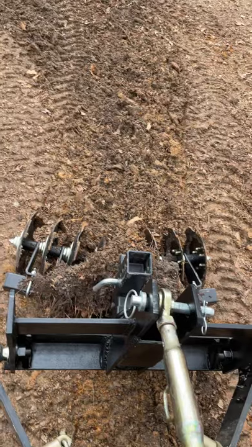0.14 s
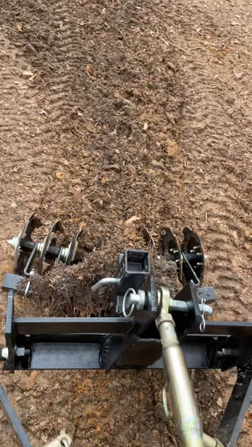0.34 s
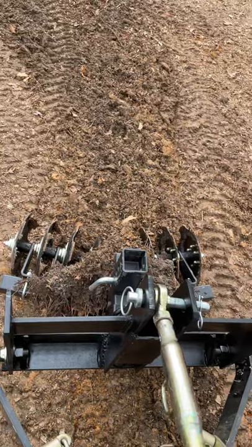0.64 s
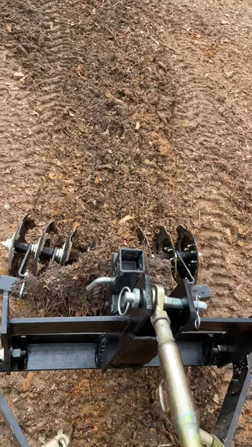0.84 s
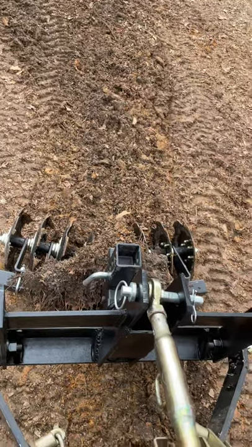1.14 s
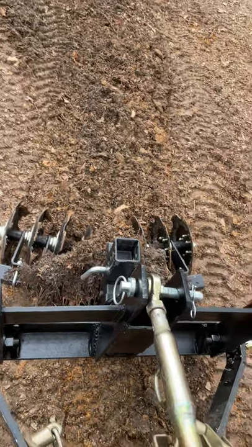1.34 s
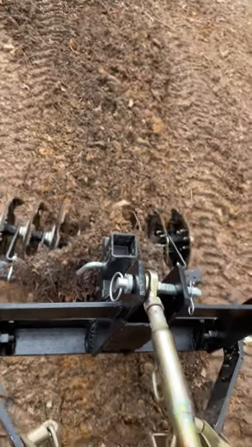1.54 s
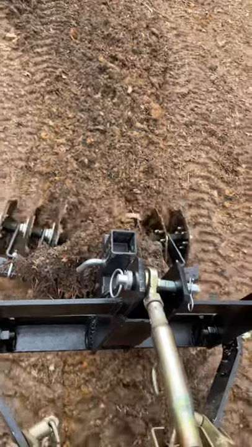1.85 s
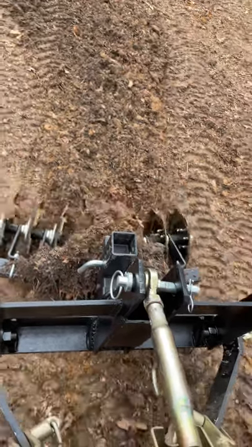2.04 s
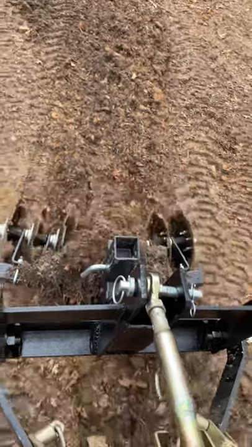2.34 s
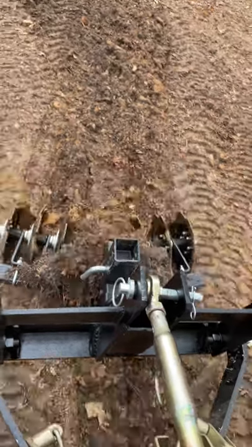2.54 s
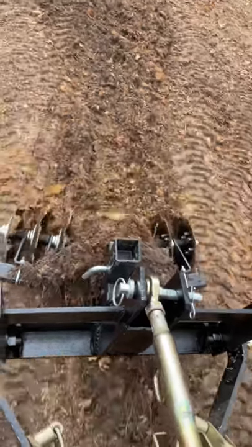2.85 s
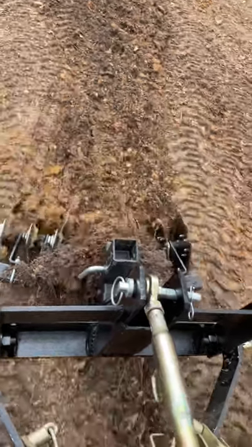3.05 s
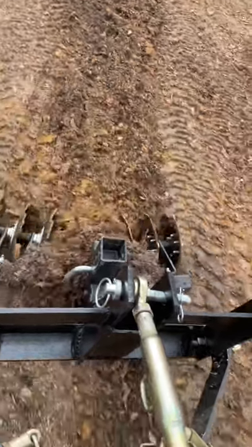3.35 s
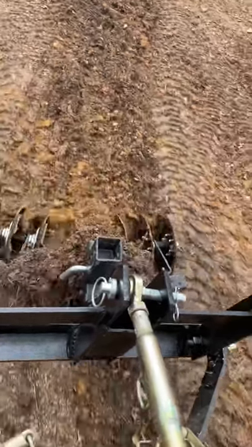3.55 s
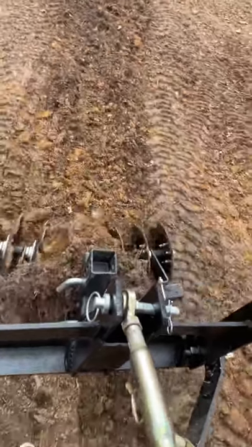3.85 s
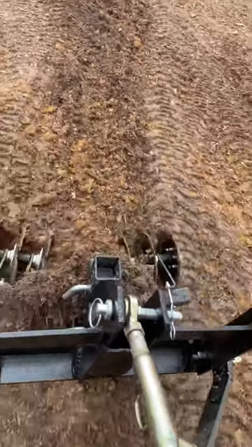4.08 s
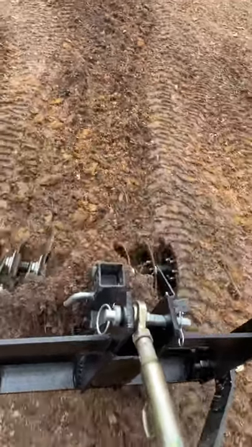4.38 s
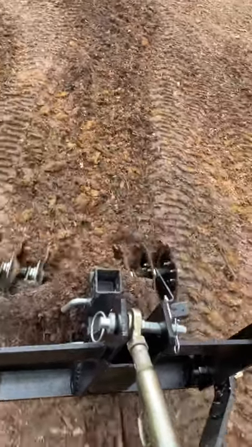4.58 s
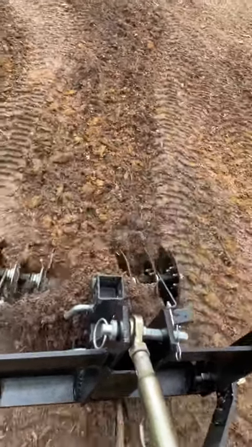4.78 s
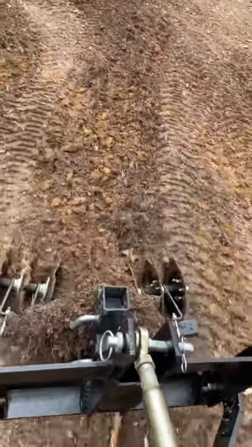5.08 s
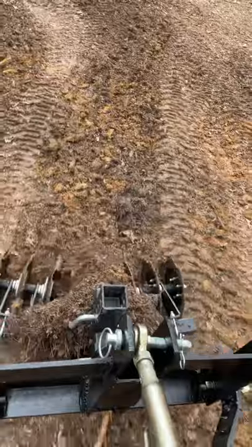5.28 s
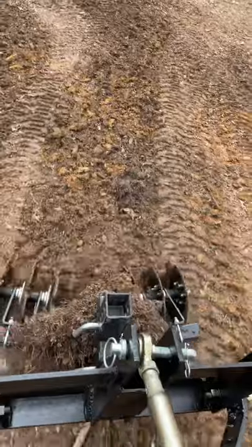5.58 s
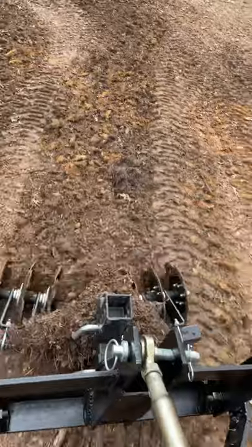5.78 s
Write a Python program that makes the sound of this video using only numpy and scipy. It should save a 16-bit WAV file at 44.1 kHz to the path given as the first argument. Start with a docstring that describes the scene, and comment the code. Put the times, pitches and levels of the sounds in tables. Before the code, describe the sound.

A three-cylinder diesel runs at steady working speed, buzzing and humming close to the microphone, with belt-driven howl and thin gear whines. At first the soil noise is an even, faint crunch; shortly after one second the drive takes load, knocks sharpen, a pump whines and soil rushes irregularly over the discs. Pebbles grate and snap, and one disc squeals very briefly after four seconds. Open field, close stereo pickup.

```python
"""On a field, at the seat of a three-cylinder diesel compact tractor that pulls a disc harrow.
Exhaust, engine orders, gears and belt drive are tones locked to the engine cycle; block, covers, panels,
casing and injector lines are noise, partly repeated each cycle, filtered by resonances or spectra. Just after
a second the drive takes load: the engine sags, the hydraulic pump whines and the soil gushes more unevenly.
Random grains crumble as soil and grate as stones on the discs; edges snap and one disc sings briefly."""
import sys
import numpy as np
from scipy import signal
from scipy.fft import rfft, irfft
from scipy.io import wavfile
from scipy.ndimage import uniform_filter1d

SR = 44100
rng = np.random.default_rng(int(sys.argv[2]) if len(sys.argv) > 2 else 0)


def unload_audio(sound):
    """Save the sound as a 16-bit wav file, at the path given as the first command line argument."""
    columns = np.transpose(np.atleast_2d(sound))
    # keep every value between -1 and 1, then stretch to whole-number steps
    steps = np.round(np.clip(columns, -1, 1) * 32767)
    wavfile.write(sys.argv[1], SR, steps.astype(np.int16))


N = 261072
TIME = np.arange(N) / SR
FREQ = np.maximum(np.fft.rfftfreq(N, 1 / SR), 1)
CYLINDERS = 3


def undb(db):
    """Logarithmic level: decibels become an amplitude gain."""
    return 10 ** (np.asarray(db) / 20)


def unit(x):
    """Normalisation: scale to rms 1."""
    return x / np.sqrt(np.mean(x ** 2))


def curves(table):
    """Linear interpolation: the columns of a curve table at every sample."""
    s, *columns = np.transpose(table)
    return [np.interp(TIME, s, column) for column in columns]


def walk(rate):
    """Low-passed random process: levels held for 1 / rate s and slewed twice; rms 1."""
    hold = int(SR / rate)
    held = np.repeat(rng.standard_normal(N // hold + 1), hold)
    slewed = uniform_filter1d(uniform_filter1d(held, hold), hold)
    return unit(slewed[:N])


def slope(points):
    """Spectral envelope: gain at every frequency from (f/Hz, level/dB) points."""
    hz, db = np.transpose(points)
    return undb(np.interp(np.log(FREQ), np.log(hz), db))


def resonances(modes):
    """Modal superposition: damped modes with squared, steep skirts, at half amplitude one width from f."""
    total = 0
    for hz, width, db in modes:
        detuning = hz / width * (FREQ / hz - hz / FREQ)
        total = total + undb(db) / (1 + .5j * detuning) ** 2
    return total


# stereo width: f/Hz, level/dB of the opposed part re the shared part
WIDTH = [(60, -41.5), (150, -48.5), (280, -20.5), (450, -15), (700, -9), (1200, -3.5), (2100, -9),
         (3100, -2), (4300, -5.5), (6000, -3.5), (8500, -10), (10000, -74.5), (13000, -34.5), (15500, -9)]


def radiate(drive, response):
    """Sum and difference: two excitations coloured alike, one shared, one opposed left to right; rms 1."""
    shared, opposed = rfft(drive) * response
    width = slope(WIDTH)
    pair = np.array([shared + width * opposed, shared - width * opposed])
    return unit(irfft(pair / np.sqrt(1 + width ** 2), N))


def tone(turns, flutter, flutter_hz):
    """Random modulation: a tone of rms 1 that flutters in amplitude and phase."""
    sway = 1 + flutter * (walk(flutter_hz) + 1j * walk(flutter_hz))
    return unit(np.real(sway * np.exp(2j * np.pi * turns)))


def rattle(cycle, repeat, size=2048):
    """Cyclostationary noise: a share of the power returns each engine cycle, early or late; the rest is new."""
    play = .0009  # looseness, engine cycles
    pattern = rng.standard_normal((2, size))
    place = cycle + play * walk(rate=30)
    again = pattern[:, (place * size).astype(int) % size]
    repeat = np.clip(repeat, 0, 1)
    return np.sqrt(repeat) * again + np.sqrt(1 - repeat) * rng.standard_normal((2, N))


def grains(per_s, spread_db):
    """Poisson impulses: random clicks, many small and a few large; rms 1."""
    sizes = undb(spread_db * np.minimum(rng.exponential(size=(2, N)), 5))
    struck = rng.random((2, N)) < per_s / SR
    return unit(struck * sizes * rng.choice([-1, 1], (2, N)))


def burst(start, rise, decay):
    """Exponential transient: an envelope that swells quickly and dies away; times in s."""
    age = np.maximum(TIME - start, 0)
    return (1 - np.exp(-age / rise)) * np.exp(-age / decay)


def loaded():
    """Load step: the share, 0-1, that the drive takes up once and keeps."""
    start_s, rise_s = 1.2, 0.12
    return np.clip((TIME - start_s) / rise_s, 0, 1)


# octave of the firing tone: t/s, level/dB
OCTAVE = [(0, -18.5), (1.1, -18.5), (1.7, -16.5), (3.1, -16), (3.55, -19), (5.5, -15), (5.85, -17.5)]


def exhaust(cycle):
    """Harmonic series: a muffler passes one smooth pressure swing per firing, a fundamental and two overtones."""
    lag = .155  # engine cycles
    angle = 2 * np.pi * CYLINDERS * (cycle - lag)
    firing_db = -14.5 - 0.33 * TIME  # fades slowly, dB per s
    octave_db, = curves(OCTAVE)
    third_db = -37.0
    total = 0
    for k, db in enumerate([firing_db, octave_db, third_db], start=1):
        total = total + undb(db) * np.cos(k * angle)
    return -np.sqrt(2) * total


# steady engine tones: multiple of the four-stroke cycle rate, level/dB at the start, drift/(dB per s)
ENGINE_TONES = [(2, -47, -3.5), (4, -48, -1), (7, -46, 1), (9, -42, -0.5), (12, -31.5, -0.5), (17, -40, -1),
                (18, -39, -1), (19, -45, -1.5), (20, -37.5, 1.3), (21, -32.5, -1.5), (22, -36, -1),
                (23, -41.5, -1), (24, -46, -0.5), (26, -38.5, -0.5), (28, -47.5, -1.5), (29, -50, 0),
                (30, -42, 0.5), (36, -42, 1.5), (46, -48.5, 0)]


def hum(cycle):
    """Engine orders: unequal cylinders fill in the orders between the firing tones."""
    total = 0
    for k, db, drift in ENGINE_TONES:
        order = tone(k * cycle, flutter=.27, flutter_hz=7)
        total = total + undb(db + drift * TIME) * order
    return total


# howl of the alternator in the cowl: t/s, level/dB before its two shares
HOWL = [(0, -27.5), (2.2, -27.5), (2.8, -30.5), (3.5, -26.5), (3.95, -26), (4.25, -28), (4.65, -23),
        (5.45, -27), (5.9, -30.5)]
# cowl resonances: f/Hz, width/Hz, relative level/dB
COWL_MODES = [(436.5, 62, -0.5), (560, 40, -12.5), (713, 240, -15)]


def belt_drive(cycle):
    """Fixed drive ratios: fan and alternator sing in step with the engine, the cowl resonates, poles whistle."""
    fan_ratio, alternator_ratio = 15.28, 22.27  # tone periods per engine cycle
    fan = tone(fan_ratio * cycle, flutter=0.06, flutter_hz=7.5)
    blades = tone(alternator_ratio * cycle, flutter=.25, flutter_hz=12)
    air = radiate(rattle(cycle, repeat=0.076), resonances(COWL_MODES))
    poles = tone(8 * alternator_ratio * cycle, flutter=.2, flutter_hz=20)
    howl = undb(curves(HOWL)[0]) * (undb(-3.5) * blades + undb(-1.5) * air)
    return undb(-26.3) * fan + howl + undb(-48 - 6 * loaded()) * poles


# diesel knock of each cylinder: place in the cycle 0-1, relative level/dB
KNOCKS = [(.02, -5.5), (.29, -12), (.69, -9.5)]


def knocks(cycle, rise=0.027, decay=0.17, scatter_db=2.0):
    """Periodic impulses: an envelope with one knock per cylinder, each of random strength; in cycles, rms 1."""
    total = 0
    for place, db in KNOCKS:
        turn, age = np.divmod(cycle - place + 1, 1)
        scatter = rng.standard_normal(N)[turn.astype(int)]
        strength = undb(db + scatter_db * scatter)
        total = total + strength * (1 - np.exp(-age / rise)) * np.exp(-age / decay)
    return unit(total)


# block resonances: f/Hz, width/Hz, relative level/dB
BLOCK_MODES = [(2285, 190, 0), (2165, 90, -7), (2920, 150, -10)]


def block(cycle, knock):
    """Forced modal vibration: each combustion pings the block."""
    drive = rattle(cycle, repeat=0.56) * (knock + 0.55)
    return undb(-34.0) * radiate(drive, resonances(BLOCK_MODES))


# how hard the harrow drags: t/s, share 0-1
DRAG = [(1.1, 0.05), (1.35, 1), (1.65, 0.84), (2.3, 0.68), (3.55, 0.96), (4.45, 0.2), (5.1, 0.2),
        (5.55, 0.5), (5.85, 1)]
# cover resonances: f/Hz, width/Hz, relative level/dB
COVER_MODES = [(1110, 42, 2), (2178, 140, -3.5), (2522, 55, -3.5), (2747, 97, -4.5), (2910, 59, -1.5),
               (3113, 260, -7.5), (3605, 120, -12.5)]


def covers(cycle, knock):
    """Amplitude modulation: covers clatter with crank and knock, louder as the harrow drags."""
    drag, = curves(DRAG)
    level_db = -35 - 0.74 * TIME + 9.5 * drag
    crank = np.cos(4 * np.pi * cycle)  # two turns per cycle
    chatter = undb(2 * walk(rate=220))
    drive = rattle(cycle, repeat=0.39) * (1 + 0.12 * crank) * (1 + 0.7 * knock) * chatter
    return undb(level_db) * radiate(drive, resonances(COVER_MODES))


# level of the booming panels: t/s, level/dB before the swells
BOOM = [(0, -22.5), (1.5, -22), (2.1, -23), (2.75, -25.5), (3.05, -22.5), (4.3, -23.5), (5, -24),
        (5.9, -22)]
# random swells of the low boom: t/s, extra level/dB
BOOM_SWELLS = [(.25, 6), (.64, 5), (.8, 4.5), (1.25, 3.5), (1.46, 5.5), (2.95, 4), (3.1, 3.5), (5.0, 6)]
# panel resonances: f/Hz, width/Hz, relative level/dB
BODY_MODES = [(229.2, 25, 6.5), (259.5, 27.4, 11)]


def panels(cycle):
    """Low-order panel modes: noise makes the panels boom with a thump once a cycle, and the noise swells by chance."""
    swell_s = 0.045  # half length
    level_db, = curves(BOOM)
    for s, db in BOOM_SWELLS:
        level_db = level_db + db * np.exp(-((TIME - s) / swell_s) ** 2)
    thump = unit(1 + .8 * np.exp(-((cycle + .22) % 1) / .14))
    return undb(level_db) * radiate(rattle(cycle, repeat=0.2) * thump, resonances(BODY_MODES))


# casing spectrum: f/Hz, relative level/dB
CASING = [(30, -4.5), (150, 0.5), (330, -15.5), (560, -2), (750, -2), (860, -7), (1120, -2), (1400, -8),
          (1600, -8), (1760, -10), (2500, -13.5), (3150, -15), (3700, -24.5), (4700, -23.5), (6200, -28.5),
          (9000, -45), (15000, -56.5)]


def casing(cycle):
    """Broadband structure-borne sound: the casing clatters, swaying slightly with the crank."""
    crank = np.cos(4 * np.pi * cycle)
    drive = rattle(cycle, repeat=0.21) * (1 + 0.048 * crank)
    return undb(-24.0) * radiate(drive, slope(CASING))


# injector line resonances: f/Hz, width/Hz, relative level/dB
INJECTOR_MODES = [(4270, 150, -5.5), (4540, 90, -10), (5315, 60, -1), (5510, 50, -2), (5735, 110, 1),
                  (6040, 60, -6), (6270, 110, -4), (6660, 90, -9)]


def injectors(cycle):
    """High-frequency line modes: the injector lines clatter, 3 dB louder under load."""
    lines = radiate(rattle(cycle, repeat=0.25), resonances(INJECTOR_MODES))
    return undb(-42 + 3 * loaded()) * lines


def engine(cycle):
    """Common excitation: the same combustion knocks drive block and covers; panels, casing and lines join."""
    knock = knocks(cycle)
    return block(cycle, knock) + covers(cycle, knock) + panels(cycle) + casing(cycle) + injectors(cycle)


# timing gear whine: t/s, level/dB
TIMING = [(0, -28), (1.0, -28), (1.5, -27.5), (1.85, -29.5), (2.1, -32), (2.5, -30), (2.75, -32),
          (2.9, -29), (3.1, -30.5), (3.37, -28.5), (3.9, -30.5), (4.08, -34), (4.3, -31), (4.6, -32.5),
          (5.3, -34), (5.9, -33.5)]


def timing_gear(cycle):
    """Tooth-mesh frequency: the timing gear sings once per tooth."""
    teeth = 52  # per engine cycle
    return undb(curves(TIMING)[0]) * tone(teeth * cycle, flutter=0.033, flutter_hz=22)


# gear, injection and alternator whines (orders 112 and 134 are the alternator's 5th and 6th harmonics):
# multiple of the cycle rate, level/dB running free, level/dB under load
GEAR_TONES = [(54, -43, -43), (58, -40, -46), (60, -46, -46), (84, -54, -49), (91, -47, -45),
              (93, -54, -44), (104, -48, -43.5), (108, -49, -44), (112, -42, -45), (128, -54, -53),
              (134, -48, -60), (144, -53, -49), (180, -50, -55)]


def gears(cycle):
    """Load-dependent whines: gears, injection and the alternator's harmonics whine throughout and change voice
    under load."""
    load = loaded()
    total = 0
    for k, free_db, loaded_db in GEAR_TONES:
        mesh = tone(k * cycle, flutter=.18, flutter_hz=25)
        total = total + undb(free_db + load * (loaded_db - free_db)) * mesh
    return total


# two thin whines: multiple of the cycle rate -> curve of t/s, level/dB
RINGING_TONES = {156: [(0, -47), (1.2, -46), (1.6, -55), (3.4, -53), (3.6, -46), (4.0, -40), (4.25, -41),
                 (4.45, -49), (4.7, -45), (5.5, -46), (5.9, -52)], 260: [(0, -43.5), (.3, -44), (.5, -41),
                 (.65, -42), (.8, -44.5), (1.1, -44.5), (1.26, -42.5), (1.36, -50), (3.0, -51), (3.4, -60)]}


def ringing(cycle):
    """High engine orders: two thin whines swell and fade."""
    total = 0
    for k, level in RINGING_TONES.items():
        total = total + undb(curves(level)[0]) * tone(k * cycle, flutter=.14, flutter_hz=40)
    return total


# level of the soil that flows over the discs: t/s, level/dB
SOIL_FLOW = [(0, -39.5), (1.15, -36.5), (1.3, -38.5), (1.55, -34), (1.85, -36), (2.3, -40.5), (3.0, -36.5),
             (3.3, -38.5), (4.2, -36.5), (4.65, -36.5), (4.85, -40.5), (5.05, -39), (5.25, -32), (5.6, -37),
             (5.8, -41.5)]
# soil spectrum: f/Hz, relative level/dB
CRUNCH = [(400, -6), (1400, 4), (2700, 3), (3100, 2), (3900, -7), (5100, -7.5), (5750, -4.5), (6800, -7),
          (8500, -8.5), (10500, -10.5), (12500, -16.5), (15500, -19)]


def soil():
    """Granular noise: soil crumbles along the discs in gushes that deepen under load."""
    gush = undb((.4 + .8 * loaded()) * walk(rate=22))
    crumbs = grains(per_s=22000, spread_db=2) * gush
    return undb(curves(SOIL_FLOW)[0]) * radiate(crumbs, slope(CRUNCH))


# hard combustions: t/s, block ring relative level/dB, cover crack relative level/dB
HARD_KNOCKS = [(.718, -13, -36), (0.813, -18, -39), (1.303, -21, -29), (1.355, -23, -33), (1.454, -23, -31),
               (1.505, -18.5, -38), (1.553, -21, -28), (1.649, -26.5, -22), (1.702, -23, -23),
               (1.75, -15, -28), (1.798, -25, -34), (1.849, -26, -35), (1.996, -30, -26), (2.292, -24, -33),
               (2.343, -20, -32), (2.393, -23, -28), (2.74, -14.5, -36), (2.816, -16.5, -32),
               (3.135, -19.5, -33.5), (3.331, -23, -24), (3.578, -16, -25), (3.677, -24.5, -29),
               (4.121, -23, -25)]
# crack resonances of the covers: f/Hz, width/Hz, relative level/dB
CRACK_MODES = [(3050, 220, 1), (3280, 250, -13)]


def hard_knocks():
    """Impulse response: hard firings, most often just after the load comes on, ring the block and crack covers."""
    ring, crack = 0, 0
    for s, ring_db, crack_db in HARD_KNOCKS:
        blow = burst(s, rise=.0013, decay=.005)
        ring = ring + undb(ring_db) * blow
        crack = crack + undb(crack_db) * blow
    block_tone = tone(2250 * TIME, flutter=.3, flutter_hz=400)  # Hz
    cover_noise = radiate(rng.standard_normal((2, N)), resonances(CRACK_MODES))
    return undb(-0.5) * ring * block_tone + undb(5.5) * crack * cover_noise


# stones snapping against a disc's edge: t/s, level/dB
CRACKS = [(.753, -41), (1.976, -45), (1.996, -39.5), (5.659, -39)]


def snaps():
    """Broadband impact: stones snap against a disc's edge as short bursts of white noise."""
    envelope = sum(undb(db) * burst(s, rise=.0002, decay=0.0066) for s, db in CRACKS)
    return envelope * rng.standard_normal((2, N))


# pump whine: piston harmonic -> curve of t/s, level/dB
PUMP_WHINE = {4: [(1.17, -60), (1.26, -35), (1.5, -29.5), (1.68, -28), (1.77, -31.5), (2.0, -30.7),
              (2.35, -33.5), (2.58, -28.7), (2.85, -32.5), (3.15, -31), (3.28, -34), (3.5, -31),
              (4.0, -31.3), (4.15, -36), (4.3, -31.5), (4.41, -41), (4.58, -34.5), (5.13, -42), (5.3, -37),
              (5.55, -37), (5.85, -30.7)], 5: [(1.05, -55), (1.2, -37.5), (1.36, -30.5), (1.5, -32),
              (1.65, -27), (1.85, -31.5), (2.08, -29), (2.25, -35), (2.6, -30.8), (3.0, -32.5), (3.2, -28),
              (3.38, -33.5), (3.52, -26.3), (3.63, -31.5), (4.2, -34.5), (4.36, -29.5), (4.46, -35.5),
              (4.55, -29.7), (4.73, -36.5), (4.9, -31.8), (5.55, -35), (5.8, -27)]}


def pump(cycle):
    """Flow ripple: the pump's pistons whine in two harmonics of the stroke rate once the load comes on."""
    strokes = 18  # per engine cycle
    total = 0
    for k, level in PUMP_WHINE.items():
        total = total + undb(curves(level)[0]) * tone(k * strokes * cycle, flutter=.14, flutter_hz=40)
    return total


def grit(per_s, spread_db, decay):
    """Shot noise: an envelope of pebbles that tick on the discs at random moments; rms 1."""
    age = np.arange(SR // 10) / SR
    hits = np.abs(grains(per_s, spread_db)[0])
    return unit(signal.fftconvolve(hits, np.exp(-age / decay))[:N])


# larger stones scraping the discs: t/s, relative level/dB, decay/s
STONES = [(1.521, -40, .02), (1.655, -39, 0.02), (1.716, -38, 0.015), (1.755, -41, .012),
          (1.995, -37.5, .016), (2.182, -41, 0.009), (2.246, -40, .014), (2.32, -40, .014),
          (2.532, -38.5, .016), (2.607, -40, 0.016), (3.245, -40, 0.016), (3.288, -36, .014),
          (3.543, -37, 0.014), (3.777, -37.5, 0.016), (3.899, -39.5, 0.023), (4.03, -41, 0.012),
          (4.093, -39, .012), (4.16, -43, .014), (4.398, -41, 0.02), (4.433, -35.5, 0.022),
          (4.587, -41, .025), (4.935, -41, .02), (4.982, -41.5, .012), (5.13, -39.5, 0.025),
          (5.48, -35, .02), (5.524, -38, .018), (5.659, -38, 0.018), (5.871, -37.5, 0.008),
          (5.904, -32, 0.019)]
# disc resonances: f/Hz, width/Hz, relative level/dB
DISC_MODES = [(2990, 210, 10.5), (4310, 1100, 0), (5470, 2400, -2.5), (7600, 2700, -13.5)]


def stones():
    """Friction-excited modes: pebbles under load and larger stones grate on the steel discs."""
    pebbles = loaded() * undb(-43.5) * grit(per_s=140, spread_db=1.0, decay=.016)
    scrape = sum(undb(db) * burst(s, rise=0.00091, decay=decay) for s, db, decay in STONES)
    grating = grains(per_s=14000, spread_db=1.5)
    skips = undb(2 * walk(rate=260))
    envelope = pebbles + undb(9.0) * scrape * skips
    return envelope * radiate(grating, resonances(DISC_MODES))


# a stone sets a disc singing: t/s, f/Hz, level/dB, decay/s
SQUEAL = (4.345, 5300, -31.5, .035)


def squeal():
    """Friction-driven oscillation: a stone rubs along one disc and makes it sing briefly."""
    s, hz, db, decay = SQUEAL
    return undb(db) * burst(s, rise=.012, decay=decay) * tone(hz * TIME, flutter=.8, flutter_hz=200)


# engine speed, sagging under load while the governor hunts: t/s, firing rate f/Hz
SPEED = [(0.0, 61.27), (0.28, 61.39), (0.44, 61.16), (0.84, 61.39), (1.28, 61.19), (1.4, 60.59),
         (1.96, 60.86), (2.2, 60.67), (3.04, 60.61), (3.36, 60.96), (4.12, 60.2), (4.52, 60.92),
         (4.64, 60.3), (4.8, 60.28), (4.92, 61.01), (5.04, 60.98), (5.16, 60.4), (5.91, 60.81)]


def scene():
    """Phase integration: engine speed turns every rotating part; the harrow follows behind."""
    firing_hz, = curves(SPEED)
    cycle = np.cumsum(firing_hz) / SR / CYLINDERS
    machine = exhaust(cycle) + hum(cycle) + belt_drive(cycle) + engine(cycle) + hard_knocks()
    whines = timing_gear(cycle) + gears(cycle) + ringing(cycle) + pump(cycle)
    harrow = soil() + snaps() + stones() + squeal()
    return machine + whines + harrow


# stereo image, opposed in the high treble: f/Hz, left lead/rad, left minus right level/dB
STEREO_IMAGE = [(150, 0, 0), (600, 0, -1.5), (1050, -.4, .5), (1460, .4, .5), (1810, -.1, 0),
                (2200, .2, .5), (2850, 1.1, -.5), (3600, 1, 0), (4300, -.1, 0), (5100, .3, 0),
                (6000, 1.3, 0), (7500, 2.2, 0), (9500, np.pi, 0)]


def record(dry):
    """Interchannel differences: the channels differ in phase and level; a low-pass cuts the top."""
    top_hz = 15800
    hz, *columns = np.transpose(STEREO_IMAGE)
    lead, balance_db = (np.interp(np.log(FREQ), np.log(hz), column) for column in columns)
    half = np.array([[.5], [-.5]])  # shared equally, left up and right down
    fade = np.minimum(np.minimum(TIME, TIME[::-1]) / .003, 1)
    spectrum = rfft(dry * fade) * undb(half * balance_db) * np.exp(1j * half * lead)
    low_pass = signal.ellip(8, .2, 70, top_hz, fs=SR, output="sos")
    return signal.sosfilt(low_pass, irfft(spectrum, N))


dry = scene()
out = record(dry)
unload_audio(out)
```